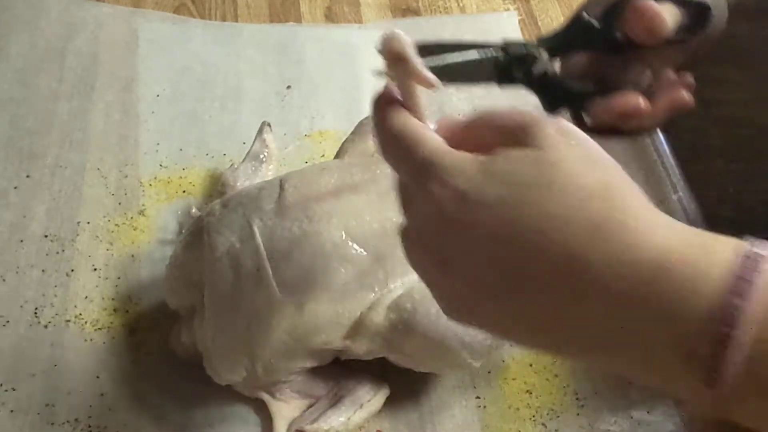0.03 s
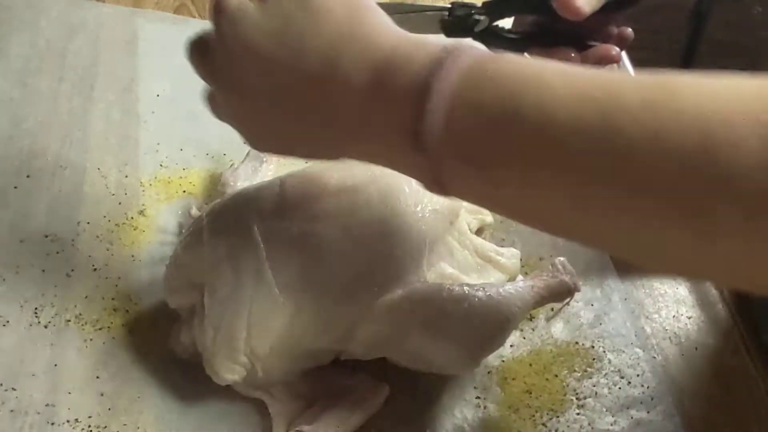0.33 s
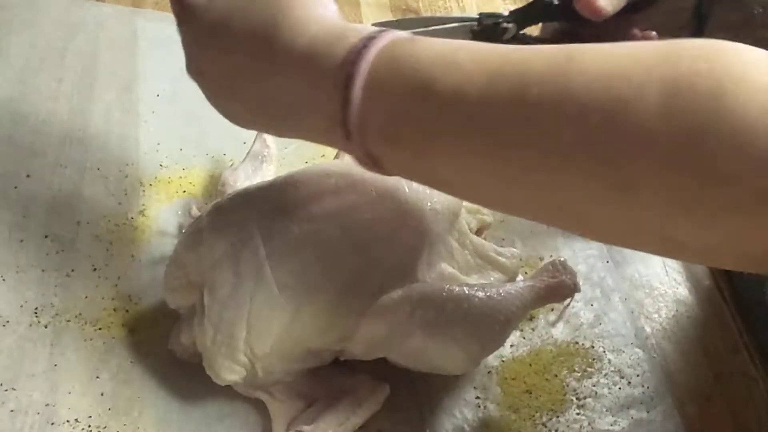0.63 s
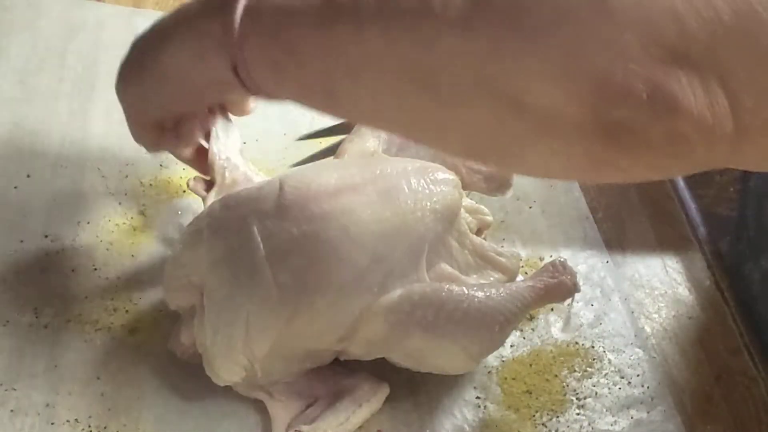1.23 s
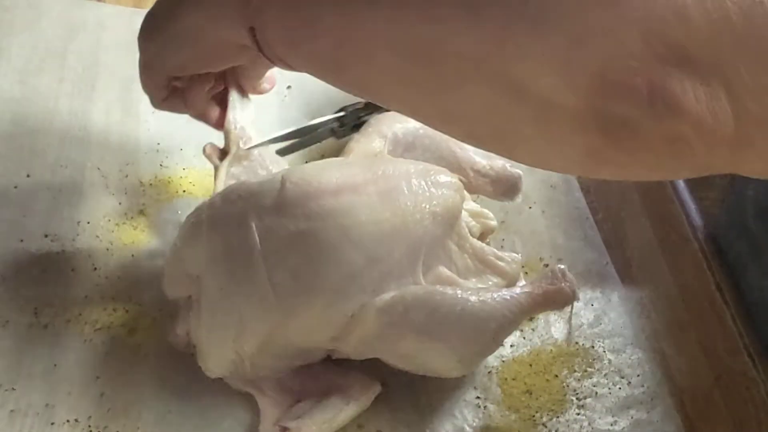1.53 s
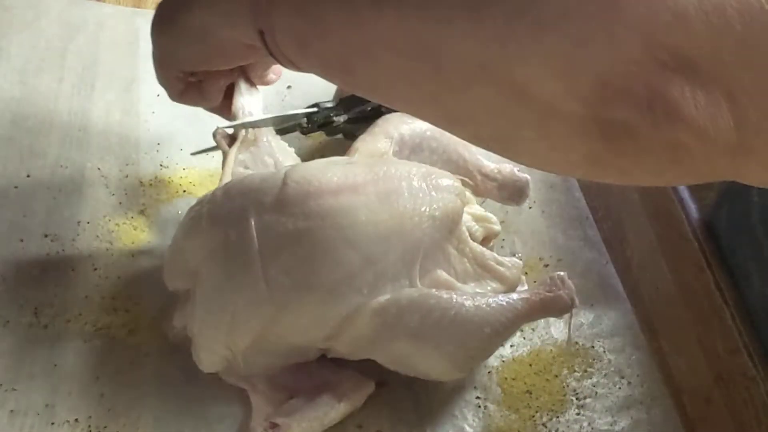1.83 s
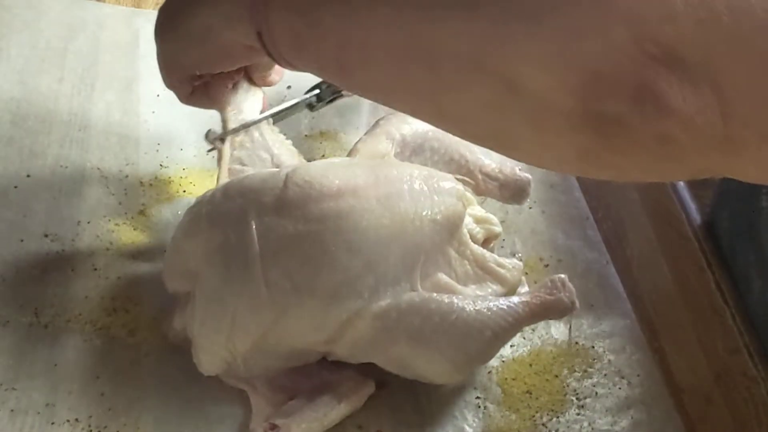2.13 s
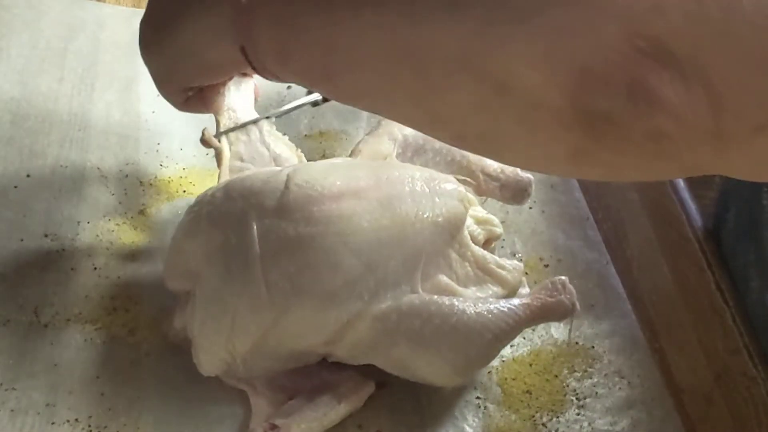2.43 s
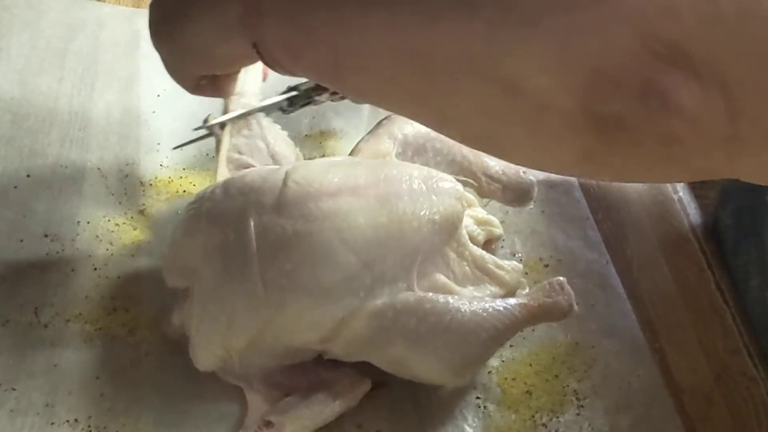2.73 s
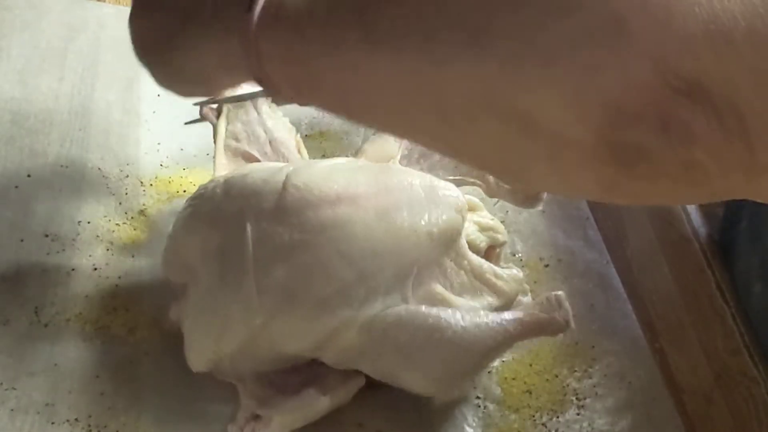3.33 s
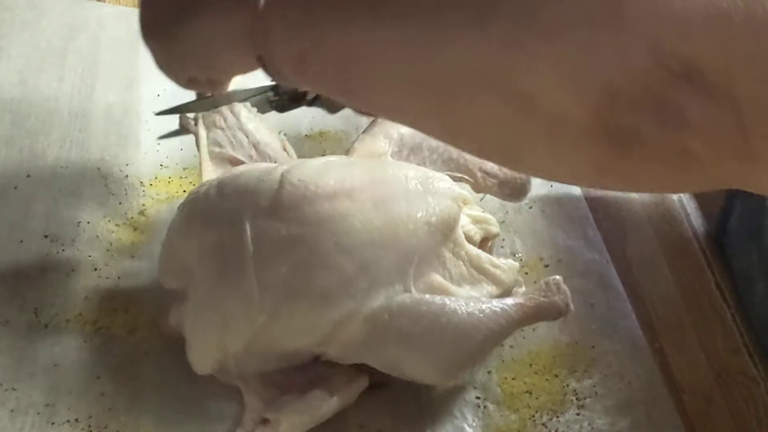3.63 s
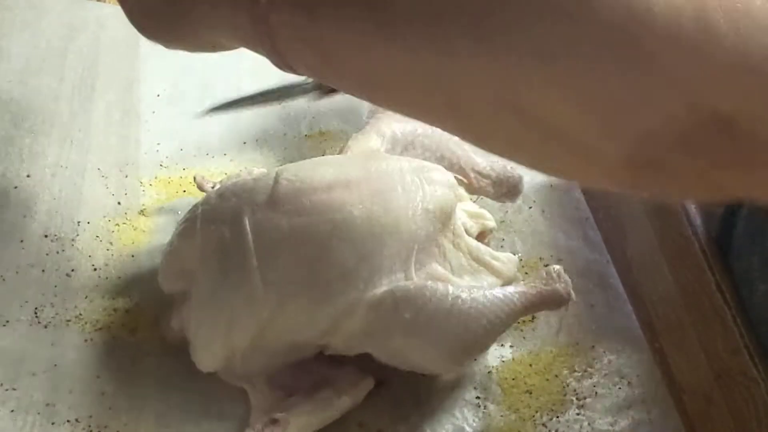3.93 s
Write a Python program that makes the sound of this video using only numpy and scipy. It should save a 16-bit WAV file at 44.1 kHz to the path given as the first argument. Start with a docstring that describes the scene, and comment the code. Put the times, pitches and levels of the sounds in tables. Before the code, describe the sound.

Shears cut a raw chicken wing with small cracks, then snap through, an appliance humming.

```python
"""A quiet kitchen, where shears work through the wing joint of a raw chicken close by.
An appliance motor's harmonics and mains hum drone over broadband room noise. The bird bumps on its
tray, paper rustles and wet flesh squelches. Stick-slip friction makes the blades rasp; tearing fibres
and cracking gristle are trains of impulses coloured by the steel's modes. At last the joint snaps and
the shears clack against their stop: two impacts that ring the modes of bone and handles."""
import sys
import numpy as np
from scipy import signal
from scipy.fft import rfft, irfft, next_fast_len
from scipy.io import wavfile
from scipy.ndimage import map_coordinates

SR = 44100
rng = np.random.default_rng(int(sys.argv[2]) if len(sys.argv) > 2 else 0)


def generate_wav(sig):
    """Save sig (samples, or channels by samples) to the path in sys.argv[1] as 16-bit PCM at SR."""
    pcm = np.round(np.clip(np.atleast_2d(sig).T, -1, 1) * 32767).astype(np.int16)
    wavfile.write(sys.argv[1], SR, pcm)


N = 176400


def amp(db):
    """Decibels to amplitude ratio."""
    return 10 ** (np.asarray(db) / 20)


def unit(x):
    """Normalisation to rms 1."""
    return x / np.sqrt(np.mean(x ** 2) + 1e-20)


def along(points, hz):
    """Interpolation of (frequency_hz, value) points on a log axis."""
    f, v = np.transpose(points)
    return np.interp(np.log(hz + 1), np.log(f + 1), v)


def curve(rows):
    """Linear interpolation of (time_s, value) points at every sample."""
    return np.interp(np.arange(N) / SR, *np.transpose(rows))


def wobble(rate):
    """Slow random modulation: a spline through rate knots a second."""
    return map_coordinates(rng.standard_normal(int(N * rate / SR) + 4), [np.arange(N) * rate / SR])


def pan(db):
    """Stereo gains for a level difference, left over right."""
    return amp(np.array([[db], [-db]]) / 2)


def hump(hz, centre, octaves):
    """A Gaussian band of height 1 in log frequency."""
    return np.exp(-.5 * (np.log2((hz + 1) / centre) / octaves) ** 2)


def resonance(modes, hz):
    """Modal superposition: each damped mode adds a Lorentzian peak of power."""
    return sum(amp(db) ** 2 / (1 + (2 * (hz - f) / width) ** 2) for f, width, db in modes)


def filtered(x, response):
    """Zero-phase filtering by multiplication of the spectrum."""
    size = next_fast_len(N + SR // 4)
    return irfft(rfft(x, size) * response(np.fft.rfftfreq(size, 1 / SR)), size)[..., :N]


def coloured(x, shape_db, size=4096):
    """Minimum-phase filtering: folding the cepstrum makes the response causal."""
    gain = amp(shape_db(np.fft.rfftfreq(size, 1 / SR)))
    cepstrum = irfft(np.log(np.maximum(gain, 1e-6)))
    cepstrum[1:size // 2] *= 2
    cepstrum[size // 2 + 1:] = 0
    return signal.fftconvolve(x, irfft(np.exp(rfft(cepstrum))))[:len(x)]


def crackle(db, rise, fall, shape_db, per_s, spread_db=3.5):
    """Shot noise, one second long: random impulses grow and decay exponentially about its middle."""
    t = np.arange(SR) / SR - .5
    envelope = np.exp(np.where(t < 0, t / rise, -t / fall))
    occurs = rng.random(SR) < per_s / SR
    polarity, size = rng.standard_normal((2, SR))
    grains = occurs * np.sign(polarity) * amp(spread_db * size)
    return amp(db) * unit(coloured(grains * envelope, shape_db)) * np.sqrt(np.mean(envelope ** 2))


def add(out, s, sound):
    """Superposition: mix in a sound with its half-second mark at time s."""
    start = round((s - .5) * SR)
    part = sound[..., max(0, -start):N - start]
    out[:, max(0, start):max(0, start) + part.shape[-1]] += part


# the room's reverberation time: frequency_hz, t60_s
ROOM_DECAY = [(200, .35), (2000, 0.3), (6000, 0.29), (14000, 0.21)]
def in_kitchen(x, counter_db=6.5, counter_t60_s=.043, direct_pan_db=9.5):
    """Convolution with an impulse response: direct sound, early counter reflections and a diffuse tail."""
    hz, t, spectra = signal.stft(rng.standard_normal((2, SR // 2)), SR, nperseg=256)
    tail = signal.istft(spectra * amp(-60 * t / along(ROOM_DECAY, hz)[:, None]), SR, nperseg=256)[1]
    t = np.arange(tail.shape[1]) / SR
    early = rng.standard_normal(tail.shape) * amp(-60 * t / counter_t60_s)
    response = tail / np.linalg.norm(tail[0]) + amp(counter_db) * early / np.linalg.norm(early[0])
    response[:, :1] += pan(direct_pan_db)
    return signal.fftconvolve(x[None], response, axes=1)


# likeness of left and right: frequency_hz, correlation
COHERENCE = [(60, .98), (170, 0.96), (260, 0.59), (370, 0), (520, 0.87), (800, 0), (1300, 0.074), (3000, 0),
             (12000, 0)]
def stereo_noise(spectrum):
    """Partly coherent noise of rms 1: the ratio of mid to side sets the correlation."""
    def response(hz):
        angle = np.arccos(np.clip(along(COHERENCE, hz), -1, 1)) / 2
        return amp(along(spectrum, hz)) * [np.cos(angle), np.sin(angle)]
    mid, side = filtered(rng.standard_normal((2, N)), response)
    return unit(np.array([mid + side, mid - side]))


# spectra of the background noises: frequency_hz, gain_db
RUMBLE_SPECTRUM = [(20, -37.5), (35, -39), (50, -14), (70, -17), (100, -9.5), (140, 0), (175, -5.5),
                   (215, -12), (300, -21.5), (420, -23), (560, -22), (850, -27.5), (1100, -48.5)]
AIR_SPECTRUM = [(500, -15), (850, -12.5), (958, -1), (1220, -1), (1550, -0.5), (1710, -4), (1830, -0.5),
                (1990, -6), (2570, -7), (3300, -14), (3810, -10.5), (4740, -15), (5150, -18), (8130, -25),
                (10200, -31), (11100, -21.5), (15000, -42.5)]
HISS_SPECTRUM = [(2000, -7), (6000, -2), (12000, 2), (15500, -7)]
# their envelopes: time_s, level_db
RUMBLE_ENVELOPE = [(0, -50.5), (.6, -52.5), (2, -53.5), (3, -52), (4, -52)]
AIR_ENVELOPE = [(0, -61.5), (.3, -64), (1.8, -64.5), (2.3, -62.5), (4, -64.5)]
HISS_ENVELOPE = [(0, -86), (.4, -75.5), (1, -78), (2, -87), (4, -73)]
def room_tone():
    """Incoherent noises add in power: low rumble, moving air and a faint hiss."""
    rumble = amp(curve(RUMBLE_ENVELOPE)) * stereo_noise(RUMBLE_SPECTRUM) * pan(db=-1.3)
    air = amp(curve(AIR_ENVELOPE)) * stereo_noise(AIR_SPECTRUM)
    hiss = amp(curve(HISS_ENVELOPE)) * stereo_noise(HISS_SPECTRUM)
    return rumble + air + hiss


# multiples of the rotation rate: harmonic_number
ORDERS = [4, 5, 9, 10, 11, 12, 13, 14, 16, 17, 18, 32]
# the partial at each multiple: level_db, pan_db, left_lead_rad
PARTIALS = [(-62.5, -2.5, 0.15), (-68.5, -1.5, .5), (-75, -9, 3), (-79.5, -10, .5), (-74, -5, -0.3),
            (-63.5, 1.5, -0.5), (-78, -4, 1.5), (-72, -5, 1), (-73, -8, 1), (-69, 4, 2), (-74, 1.5, 0.85),
            (-72, 0, 3.8)]
# envelope of the whine: time_s, gain_db
WHINE_ENVELOPE = [(0, -6), (.2, -14.5), (.4, -1.5), (1, 0.5), (3, 3), (4, 1)]
# steady low tones: pitch_hz, level_db
HUM_TONES = [(119.03, -49.5), (44.22, -71.5)]
def appliance(rotation_hz=44.26, drift=.00077, whine_gain_db=1, waver_db=1):
    """Periodic motion gives a harmonic series: a slightly unsteady motor whines over a steady hum."""
    t = np.arange(N) / SR
    turns = np.cumsum(rotation_hz * (1 + drift * wobble(4.1))) / SR
    whine = np.zeros((2, N))
    for order, (db, pan_db, lead) in zip(ORDERS, PARTIALS):
        gain = amp(db + waver_db * wobble(4.95)) * pan(pan_db)
        phase = 2 * np.pi * (order * turns + rng.random())
        whine += gain * np.sin(phase + np.array([[lead], [-lead]]) / 2)
    hum = sum(amp(db) * np.sin(2 * np.pi * (hz * t + rng.random())) for hz, db in HUM_TONES)
    return np.sqrt(2) * (amp(whine_gain_db + curve(WHINE_ENVELOPE)) * whine + hum)


# the bird bumping on the tray: start_s, level_db, pitch_hz, rise_s, fall_s
TRAY_BUMPS = [(1.039, -24, 158, .012, .014), (1.06, -33, 72, .008, .012), (1.072, -25, 128, .009, .018)]
# spectrum of the thud: frequency_hz, gain_db
THUD_SPECTRUM = [(30, -16), (70, -13), (100, -7), (140, 2), (185, -4.5), (250, -13), (400, -36),
                 (2000, -66)]
def tray_bumps(thud_db=-16):
    """Damped oscillation: a soft impact rings the tray at a low pitch, with a dull thud of flesh."""
    out = np.zeros((2, N))
    t = np.maximum(np.arange(SR) / SR - .5, 0)
    for s, db, pitch_hz, rise, fall in TRAY_BUMPS:
        ring = amp(db) * np.sin(2 * np.pi * pitch_hz * t) * (1 - np.exp(-t / rise)) * np.exp(-t / fall)
        thud = crackle(db + thud_db, rise, fall, lambda hz: along(THUD_SPECTRUM, hz), per_s=6000)
        add(out, s, ring + thud)
    return out


# wet skin shifting on paper: peak_s, level_db, rise_s, fall_s
PAPER_RUSTLES = [(.005, -74, 0.0044, 0.011), (1.04, -67, 0.011, 0.014), (1.078, -68, 0.013, .018),
                 (1.139, -70, 0.039, 0.0466)]
# spectrum of the rustle: frequency_hz, gain_db
PAPER_SPECTRUM = [(500, -14), (2000, 0), (5000, 0.5), (10000, -0.5), (15500, -2.5)]
def paper_rustles():
    """Sparse broadband shot noise: skin and paper rustle as the bird is shifted."""
    out = np.zeros((2, N))
    for s, db, rise, fall in PAPER_RUSTLES:
        add(out, s, in_kitchen(crackle(db, rise, fall, lambda hz: along(PAPER_SPECTRUM, hz), per_s=1200)))
    return out


# the wing being stretched: peak_s, level_db, rise_s, fall_s, pitch_hz, width_octaves
FLESH_SQUELCHES = [(.16, -79, .035, .026, 4000, .08), (1.29, -81, .025, .1, 4300, .17),
                   (1.61, -78.5, .07, .05, 4300, .17), (1.898, -75, .007, .017, 4200, .05),
                   (2.58, -76, .011, .021, 4300, .1), (2.85, -81, .0074, .049, 4300, .15)]
def flesh_squelches(skirt_db=-22):
    """Narrowband noise has a pitch: stretched wet flesh ticks in one band with a broad, faint skirt."""
    out = np.zeros((2, N))
    for s, db, rise, fall, pitch_hz, width in FLESH_SQUELCHES:
        def band_db(hz):
            return 20 * np.log10(hump(hz, pitch_hz, width) + amp(skirt_db) * hump(hz, pitch_hz, 1) + 1e-4)
        add(out, s, in_kitchen(crackle(db, rise, fall, band_db, per_s=1200)))
    return out


# modes of the blades: frequency_hz, bandwidth_hz, gain_db
BLADE_MODES = [(2150, 310, -3), (2950, 300, -1), (4150, 223, -1), (6850, 220, -3), (8800, 290, -6),
               (10750, 90, 2), (11600, 150, -4), (12200, 110, -3), (14700, 150, -3), (15300, 150, -2)]
def steel_db(hz):
    """Resonance: the blades lift the plain contact sound near their natural frequencies."""
    return 10 * np.log10(1 + resonance(BLADE_MODES, hz))


# steel rubbing on steel: peak_s, level_db, rise_s, fall_s, centre_hz, width_octaves, scrape_db
BLADE_RASPS = [(0.076, -50, 0.00081, 0.0032, 10300, 0.55, -12), (2.093, -69.5, 0.009, .025, 9700, .1, -7),
               (2.16, -70, 0.0354, 0.022, 10700, .13, -7), (2.603, -44.5, 0.0018, .005, 15000, 0.08, -15),
               (2.608, -51, .004, .004, 11200, .2, -19), (2.624, -63, .006, 0.014, 11500, 0.3, -16),
               (3.701, -55.5, 0.0073, .015, 8500, 0.11, -9), (3.735, -52, .014, .012, 10700, 0.2, -13),
               (3.769, -47, 0.002, 0.011, 11500, 0.37, -16)]
def blade_rasps():
    """Stick-slip friction between the edges excites their high modes: a bright band over a broad scrape."""
    out = np.zeros((2, N))
    for s, db, rise, fall, centre, width, scrape_db in BLADE_RASPS:
        def rasp_db(hz):
            friction = hump(hz, centre, width) + amp(scrape_db) * hz / centre
            return 20 * np.log10(friction + 1e-4) + steel_db(hz)
        add(out, s, in_kitchen(crackle(db, rise, fall, rasp_db, per_s=7000)))
    return out * pan(db=2)


# fibres parting under the blades: peak_s, level_db, rise_s, fall_s
FIBRE_CUTS = [(2.206, -70, 0.033, 0.016), (2.258, -59, 0.027, 0.011), (2.37, -72, 0.03, 0.03),
              (2.995, -68, 0.066, 0.045), (3.42, -77, 0.018, 0.033), (3.735, -58, 0.027, 0.018),
              (3.79, -51, 0.019, 0.013), (3.811, -49.5, 0.019, 0.014)]
# spectrum of the tearing: frequency_hz, gain_db
FIBRE_SPECTRUM = [(300, -48), (1000, -3), (2300, 1), (4300, 4.5), (6000, 4.5), (8000, 3.5), (12000, -2.5),
                  (15500, -1)]
def fibre_cuts():
    """Shear failure: skin and sinew tear as the blades close, one impulse for each fibre."""
    out = np.zeros((2, N))
    tear_db = lambda hz: along(FIBRE_SPECTRUM, hz) + steel_db(hz)
    for s, db, rise, fall in FIBRE_CUTS:
        add(out, s, in_kitchen(crackle(db, rise, fall, tear_db, per_s=6000)))
    return out


# gristle cracking: peak_s, level_db, low_mid_db, treble_db, fall_s, pitch_hz, pitch_lift_db
GRISTLE_CRACKS = [(1.764, -69, -3, -5, .003, 6000, 5), (2.192, -54, -6, 4.5, .004, 10000, 3),
                  (2.2225, -55, 5, 0, .005, 3200, 3), (2.2365, -54.5, 2, -4, .002, 7000, 15),
                  (2.3405, -53.5, 4, -2, .004, 3000, 8), (2.349, -58.5, 2, -12, .003, 2900, 9),
                  (2.3815, -49.5, 0, -4, .003, 4100, 5), (2.389, -57.5, 0, -10, .003, 3000, 8),
                  (2.650, -59.5, -3, 6, .0044, 13000, 8), (2.685, -59, -16, 2, .0035, 6800, 5),
                  (2.706, -65.5, -8, 0, .009, 6800, 6), (2.982, -58, -14, 0, .0058, 8500, 5),
                  (2.99, -56.5, -11, 3, .008, 7800, 5), (3.074, -64, -21, -7, .0055, 6000, 2),
                  (3.099, -70, -10, 0, .006, 7000, 2), (3.801, -42, -2, 6, .005, 8000, 4),
                  (3.812, -39.3, -3, 7, .0045, 4500, 4), (3.984, -55, 3, -3, .0053, 3100, 2)]
def gristle_cracks(rise_s=.0016):
    """Acoustic emission: each crack is a short run of fractures that also rings the blades."""
    out = np.zeros((2, N))
    for s, db, low_db, treble_db, fall, pitch_hz, lift_db in GRISTLE_CRACKS:
        spectrum = [(100, low_db - 16), (700, low_db - 8), (1900, low_db), (3000, 0), (5000, 0),
                    (12000, treble_db), (15500, treble_db - 5.5)]
        def crack_db(hz):
            return along(spectrum, hz) + lift_db * hump(hz, pitch_hz, octaves=.13) + steel_db(hz)
        add(out, s, in_kitchen(crackle(db, rise_s, fall, crack_db, per_s=9000)))
    return out


# the joint snapping, the shears hitting their stop: time_s, impulse_db, burst_db, rise_s, fall_s
JOINT_SNAP = (3.7682, -31.5, -38.3, .0005, .0042)
STOP_CLACK = (3.9385, -38, -46, .001, .003)
# modes of the bodies they ring: frequency_hz, bandwidth_hz, gain_db
BONE_MODES = [(1080, 130, -7), (1440, 200, -.5), (2020, 230, 3), (2980, 250, -8), (4050, 250, -6),
              (4600, 200, -6), (5360, 200, -11), (8900, 700, -14)]
HANDLE_MODES = [(1030, 350, 2), (1900, 600, -4), (2900, 300, 1), (4040, 110, 9), (5680, 300, -4),
                (6080, 100, -2), (7250, 400, -5), (8270, 150, -1), (9360, 200, -5), (12000, 3500, -12)]
def impact(event, modes, cutoff_hz=890):
    """Impulse excitation: one sharp blow and a burst of lesser ones ring a small body's modes."""
    s, impulse_db, burst_db, rise, fall = event
    def body_db(hz):
        radiation = hz ** 4 / (hz ** 4 + cutoff_hz ** 4)  # a small body radiates bass poorly
        return 10 * np.log10(resonance(modes, hz) * radiation + 1e-8)
    ring = coloured(1.0 * (np.arange(SR) == SR // 2), body_db)
    burst = crackle(burst_db, rise, fall, body_db, per_s=9000)
    out = np.zeros((2, N))
    add(out, s, in_kitchen(amp(impulse_db) * ring / np.abs(ring).max() + burst))
    return out


def scene():
    """Linear superposition of the kitchen's drone, the bird and the shears."""
    drone = room_tone() + appliance()
    handling = tray_bumps() + paper_rustles() + flesh_squelches()
    cutting = blade_rasps() + fibre_cuts() + gristle_cracks()
    return drone + handling + cutting + impact(JOINT_SNAP, BONE_MODES) + impact(STOP_CLACK, HANDLE_MODES)


TOP_HZ = 15830
def record(dry):
    """An ideal low-pass filter limits the bandwidth."""
    return filtered(dry, lambda hz: hz < TOP_HZ)


dry = scene()
out = record(dry)
generate_wav(out)
```